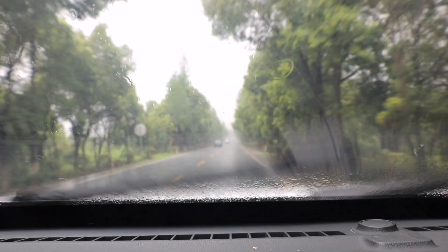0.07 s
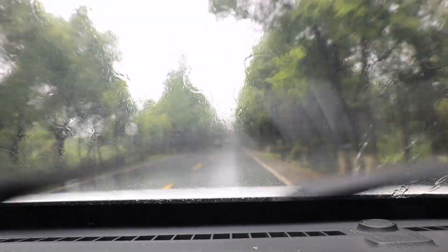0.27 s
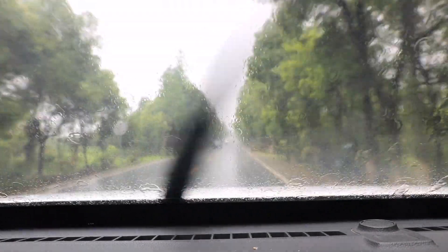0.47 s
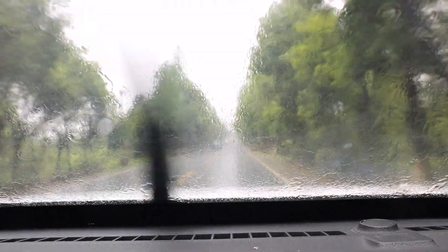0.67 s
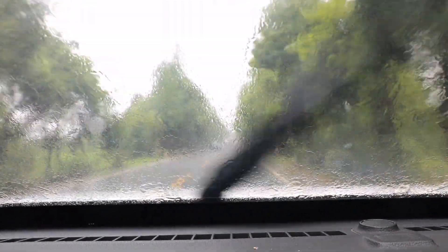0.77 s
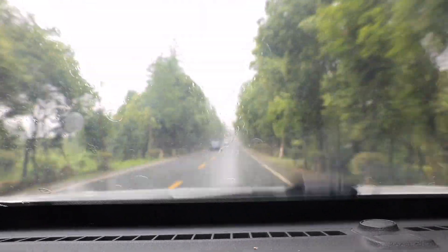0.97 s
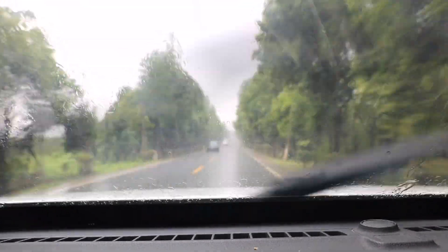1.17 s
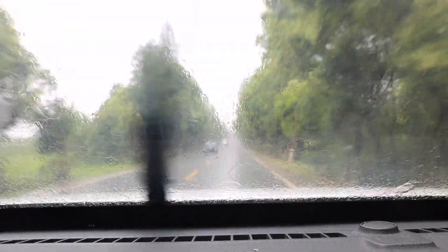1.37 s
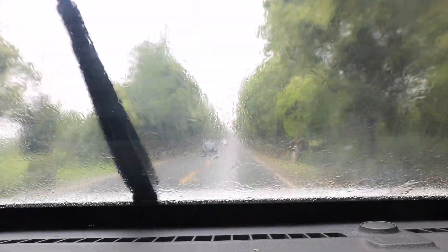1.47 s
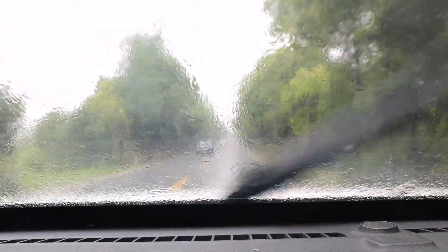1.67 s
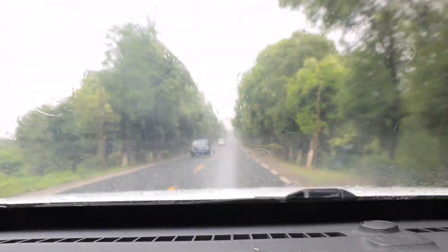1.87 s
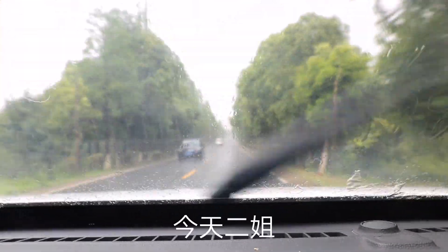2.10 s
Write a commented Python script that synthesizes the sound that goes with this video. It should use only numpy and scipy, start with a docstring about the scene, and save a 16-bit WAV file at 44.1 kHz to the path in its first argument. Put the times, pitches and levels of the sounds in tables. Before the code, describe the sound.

Heavy rain patters on a moving car's windshield and roof, heard from inside, cutting in just after the start and lasting to about 2 seconds. Bigger drops tick sharply through a fine hiss. The road rumbles low underneath, with dull thumps, strongest near 0.4 and 1.7 seconds. Soft wet wiper swishes pass around 0.4 and 0.9 seconds, then more clearly at 1.3 to 1.4 and 2.1.

```python
"""Heavy rain on a moving car, heard from the cabin; the sound cuts in just after the start.
Drops tick on the windshield and drum on the roof over a fine hiss of spray.
The road rumbles and thumps, and the wipers sweep the wet glass."""
import sys
import numpy as np
from scipy import signal
from scipy.fft import rfft, irfft, next_fast_len
from scipy.io import wavfile
from scipy.ndimage import uniform_filter1d, map_coordinates

SR = 44100
rng = np.random.default_rng(int(sys.argv[2]) if len(sys.argv) > 2 else 0)


def wav_record(signal):
    """Record a signal, one row per channel, as 16-bit PCM in the file named by sys.argv[1]."""
    frames = np.transpose(np.atleast_2d(signal))
    bounded = np.clip(frames, -1, 1)
    # unit amplitude maps onto the largest positive 16-bit level
    quanta = np.round(bounded * 32767).astype(np.int16)
    wavfile.write(sys.argv[1], SR, quanta)


N = 94241

START_S = .15  # fixed
TOP_HZ = 15850  # fixed
# how hard the rain hits the glass (s, level dB)
RAIN = [(.15, -29), (.25, -27.5), (.45, -27.5), (.51, -26.5), (.56, -28), (.68, -27), (.71, -30), (.74, -23), (.77, -32), (.82, -25), (.87, -28.5), (.93, -27), (1.16, -27.5), (1.19, -30.5), (1.31, -29.5), (1.34, -25), (1.37, -32.5), (1.4, -28), (1.43, -29.5), (1.49, -30.5), (1.56, -26.5), (1.68, -28.5), (1.88, -25), (1.95, -29), (2.0, -24), (2.06, -31), (2.1, -23.5), (2.14, -34)]
# the heaviest drops on the windshield (s, knock dB, bright splash dB, left-right dB)
BIG_DROPS = [(.1981, -1, -3, 1), (.207, 5, -16, -3), (.2717, -2, -5, -3), (.2927, 7, -10, 6), (.3056, 1, -10, -2),
             (.4141, 3, -16, 4), (.4274, 3, -15, 0), (.494, 5, -18, 1), (.5106, 5, -12, 4), (.517, 3, -14, 2),
             (.5222, 3, -8, -4), (.533, 6, -15, 6), (.6058, 4, -20, -4), (.6168, 2, -9, 1), (.6335, -3, -6, 4),
             (.6661, 4, -4, 6), (.6763, 3, -16, -1), (.7319, 4, -7, 2), (.7445, 1, -7, 3), (.7846, -1, -8, 3),
             (.7933, 0, -6, 3), (.8231, 1, -5, -1), (.852, 0, -8, 0), (.9048, 3, -18, -3), (.9418, 2, -5, -2),
             (1.0361, 2, -4, 3), (1.039, -2, -6, -2), (1.1232, 1, -7, -1), (1.1595, 7.5, -13, -6), (1.1625, 5.5, -13, 4),
             (1.2285, 1, -17, 6), (1.2549, -3, -7, -4), (1.2855, -1, -4, -3), (1.2954, -3, -12, 1), (1.3374, 4, -17, -1),
             (1.3855, 5, -18, -1), (1.4023, 3, -6, 4), (1.4761, 1, -17, 4), (1.4896, -1, -11, 0), (1.5167, 4, -9, -2),
             (1.5278, 2, -6, 2), (1.5398, -6, -6, -3), (1.5533, 0, -10, 4), (1.5713, 5, -15, 2), (1.6058, 0, -4, -3),
             (1.671, 1, -13, -2), (1.7093, 2, -17, -2), (1.8115, 5, -10, 2), (1.8466, 5, -15, 1), (1.8653, 3, -7, 3),
             (1.9679, 2, -17, -6), (1.9825, 1, -6, -4), (1.9956, 5, -15, 0), (2.0038, -1, -6, -1), (2.0246, 7, -10, -3),
             (2.0264, 6, -14, 6), (2.1004, 1, -9, 0)]  # fixed
# one drop on the glass (Hz, dB)
GLASS = [(100, -23), (350, -3.5), (700, -5.5), (1300, -10.5), (1750, -3), (2200, -6.5), (2700, 2), (3400, 0.5), (4400, -1.5), (5800, -4), (9000, -6), (9800, -10), (12500, -2.5), (15800, -46)]
SPREAD_S, RING_S, RING_DB = .0012, 0.0031, -1.5
PORT_LAG_S, PAN_DB = .00029, 3.5  # widest delay between the microphone's ports; level scatter between them
# one droplet of the spray (Hz, dB)
SPRAY = [(200, -61), (1500, 3), (3300, 2.5), (6000, -8.5), (9000, -5), (9800, -6), (12500, -13), (15800, -15)]
# roof panel under a drop (Hz, dB)
ROOF = [(40, -34.5), (85, 1.5), (130, 1), (210, 1.5), (290, -0.5), (380, -9.5), (650, -13), (800, -20), (1050, -10.5), (1500, -14), (4000, -45)]
# road noise in the cabin (s, level dB) and its colour (Hz, dB)
ROAD_LEVEL = [(.15, -29), (.4, -30), (.53, -27.5), (.66, -27.5), (.72, -32), (.85, -32), (.91, -28.5), (1.1, -30), (1.27, -30), (1.35, -27), (1.44, -30), (1.78, -32.5), (1.83, -28), (1.9, -30.5), (2.04, -33), (2.13, -27.5)]  # fixed
ROAD = [(12, -35), (22, -7), (29, -9), (36, -3.5), (46, -7), (63, -11.5), (85, -2.5), (112, -8), (220, -10.5), (400, -13.5), (1000, -19.5), (3000, -49)]
ROAD_DB = 1
# dull thumps of the body, from bumps and turning wipers (s, peak dB, pitch Hz, t60 s)
THUMPS = [(.308, -15, 58, .1), (.338, -20, 220, .12), (.424, -16, 190, .14), (.443, -7, 90, .12), (.445, -17, 255, .1), (.468, -13, 60, .11), (.645, -18, 110, .14), (.73, -18, 200, .13), (.885, -14, 195, .15), (.915, -17, 100, .17), (.965, -20, 240, .15), (1.005, -20, 210, .15), (1.215, -15, 245, .16), (1.29, -18, 180, .15), (1.345, -14.5, 115, .2), (1.477, -19, 90, .1), (1.742, -9.5, 197, .15), (1.895, -19, 340, .12), (2.088, -11.5, 180, .13)]  # fixed
# the overtones of a thump (ratio to its pitch, dB)
BODY = [(.72, -15), (0.996, -1), (1.36, -9), (1.899, -13)]
# a wet swish, likely the wiper blades pushing water (s, level dB) and its colour (Hz, dB)
SWISH_LEVEL = [(.15, -48), (.3, -40), (.36, -31), (.41, -41), (.6, -46), (.87, -45), (.905, -33), (.97, -41), (1.2, -38), (1.265, -26.5), (1.305, -33), (1.345, -27.5), (1.37, -28.5), (1.402, -23.5), (1.44, -39), (1.68, -40), (1.8, -33), (1.92, -32), (1.98, -38), (2.07, -40), (2.105, -26.5), (2.14, -32)]  # fixed
SWISH = [(150, 3.5), (400, -1), (540, 10.5), (660, 16.5), (780, 3.5), (900, 8), (1050, 10.5), (1300, 0.5), (1800, 6.5), (4000, -38)]
# likeness of left and right in the cabin (Hz, -1..1)
ALIKE = [(60, .985), (250, .94), (600, .73), (1100, .35), (1700, .25), (2300, -.4), (3600, 0), (12000, 0)]  # fixed
# level of the fine spray (s, level dB)
SPRAY_LEVEL = [(.15, -38), (.3, -37.5), (.46, -39.5), (.52, -36), (.56, -39), (.67, -38), (.72, -39), (.78, -37.5), (.9, -37.5), (1.02, -38.5), (1.045, -36), (1.07, -38), (1.165, -39), (1.185, -46), (1.27, -45), (1.29, -41), (1.4, -41), (1.44, -45), (1.508, -42), (1.516, -35.5), (1.62, -37), (1.69, -40), (1.8, -37.5), (1.95, -39), (2.01, -37.5), (2.06, -40), (2.1, -37), (2.14, -39)]  # fixed
ROOF_DB, ROOF_RING_S, ROOF_RANGE_DB = -29, 0.0045, 6.5
# the cabin's steady drone, likely the engine (Hz, dB)
DRONE = [(46, -34.5), (84, -41), (216, -38.5)]
THUMP_ATTACK_S = .007  # fixed
PATTER_DB = 1.53
CABIN_T60_S, CABIN_DB = 0.052, -7.5
CABIN_DELAY_S = .003  # fixed
SIZE_RANGE_DB = 10  # fixed
DULL_S = .00002  # fixed
BIG_DB, SPLASH_DB = -3, .3  # fixed
SPRAY_RING_S = 0.0026  # decay of a droplet's prickle
SPRAY_RANGE_DB = 20  # fixed
SPRAY_DB = 4.2  # fixed
CEILING = .75  # fixed
BEND_HZ = 3000  # fixed
BIG_RING_S, BIG_RING_DB = .004, 1  # fixed
SWISH_FLUTTER_DB = 2  # fixed
GLASS_TOP_HZ, KNOCK_TOP_HZ = 8000, 5800  # fixed


def amp(db):
    """Decibels to gain."""
    return 10 ** (np.asarray(db) / 20)


def unit(x):
    """Scale to rms 1."""
    return x / np.sqrt(np.mean(x ** 2) + 1e-20)


def along(points, hz):
    """(Hz, value) points on a log axis."""
    f, v = np.transpose(points)
    return np.interp(np.log(hz + 1), np.log(f + 1), v)


def level(rows):
    """Gain per sample from (s, dB) rows."""
    return amp(np.interp(np.arange(N) / SR, *np.transpose(rows)))


def wobble(rate):
    """A smooth random curve, rate knots a second."""
    return map_coordinates(rng.standard_normal(N // 100), [np.arange(N) * rate / SR], mode="mirror")


def filtered(x, response):
    """x times a response of frequency."""
    m = next_fast_len(N + SR // 2, real=True)
    return irfft(rfft(x, m) * response(np.fft.rfftfreq(m, 1 / SR)), m)[..., :N]


def struck(x, spectrum, size=4096):
    """Pass blows through a causal colour of unit energy."""
    cepstrum = irfft(np.log(amp(along(spectrum, np.fft.rfftfreq(size, 1 / SR)))))
    cepstrum[1:size // 2] *= 2
    cepstrum[size // 2 + 1:] = 0
    ring = irfft(np.exp(rfft(cepstrum)))
    return signal.fftconvolve(x, ring[None] / np.linalg.norm(ring), axes=1)[:, :N]


def diffuse(pair):
    """Give two unrelated signals the cabin's left-right likeness."""
    turn = lambda hz: np.arccos(np.clip(along(ALIKE, hz), -1, 1)) / 2
    mid, side = filtered(pair, lambda hz: np.array([np.cos(turn(hz)), np.sin(turn(hz))]))
    return np.array([mid + side, mid - side])


def rush(spectrum):
    """Diffuse stereo noise of rms 1."""
    return unit(diffuse(filtered(rng.standard_normal((2, N)), lambda hz: amp(along(spectrum, hz)))))


def impacts(times, db, pan_db, ring_s, ring_db, size=768):
    """Each drop is a tick and a short ring, with its own softness and direction.
    The tick crosses the panel as a bending wave, treble first: the farther the drop, the longer the chirp."""
    t, hz = np.arange(size) / SR, np.fft.rfftfreq(size, 1 / SR)
    soft, direction, distance, polarity = rng.random((len(times), 4)).T
    ticks = np.exp(-4j * np.pi * SPREAD_S * (.5 + distance[:, None]) * np.sqrt(BEND_HZ * hz))  # fixed
    ticks *= np.sign(polarity - .5)[:, None]
    rings = rng.standard_normal((len(times), size)) * np.exp(-t / ring_s)
    rings *= amp(ring_db) / np.linalg.norm(rings, axis=1, keepdims=True)
    bursts = irfft((ticks + rfft(rings)) / (1 + 2j * np.pi * hz * DULL_S * soft[:, None]))
    bursts /= np.linalg.norm(bursts, axis=1, keepdims=True)
    out = []
    for side in (1, -1):
        at = np.abs(np.round((times + side * (direction - .5) * PORT_LAG_S) * SR)).astype(int)
        weights = bursts * amp(db + side * pan_db / 2)[:, None]
        out.append(np.bincount((at[:, None] + np.arange(size)).ravel(), weights.ravel(), N)[:N])
    return np.array(out)


def shower(ring_s, range_db, count):
    """count drops a second at random moments, many light and few heavy."""
    when, weight, place = rng.random((count * N // SR, 3)).T
    return impacts(when * N / SR, -range_db * np.sqrt(weight), PAN_DB * (2 * place - 1), ring_s, RING_DB)


def windshield():
    """Dense patter and fine spray; each heavy drop knocks the glass and throws a bright splash."""
    patter = amp(PATTER_DB) * level(RAIN) * unit(struck(shower(RING_S, SIZE_RANGE_DB, count=1400), GLASS))
    s, knock_db, splash_db, pan_db = np.transpose(BIG_DROPS)
    knocks = struck(impacts(s, knock_db + BIG_DB, pan_db, BIG_RING_S, BIG_RING_DB), GLASS)
    splashes = struck(impacts(s, splash_db + SPLASH_DB, pan_db, BIG_RING_S, BIG_RING_DB), SPRAY)
    return soften(patter, GLASS_TOP_HZ) + soften(knocks, KNOCK_TOP_HZ) + splashes + spray()


def roof():
    """Drops drum on the lined roof panel."""
    return amp(ROOF_DB) * unit(struck(shower(ROOF_RING_S, ROOF_RANGE_DB, count=400), ROOF))


def spray():
    """The finest droplets prickle brightly on the glass."""
    return amp(SPRAY_DB) * level(SPRAY_LEVEL) * unit(struck(shower(SPRAY_RING_S, SPRAY_RANGE_DB, count=520), SPRAY))


def road():
    """Tyres rumble under a slightly unsteady drone."""
    t = np.arange(N) / SR
    drone = sum(np.sqrt(2) * amp(db) * np.sin(2 * np.pi * hz * t + .5 * wobble(10.46)) for hz, db in DRONE)
    return amp(ROAD_DB) * level(ROAD_LEVEL) * rush(ROAD) + drone


def thumps():
    """Soft blows ring the body panels briefly."""
    out, t = np.zeros(N + SR), np.arange(SR // 2) / SR
    for s, db, hz, t60 in THUMPS:
        envelope = np.exp(-np.log(1000) * t / t60) * (1 - np.exp(-t / THUMP_ATTACK_S))
        ring = sum(amp(part_db) * np.sin(2 * np.pi * (hz * ratio * t + rng.random())) for ratio, part_db in BODY)
        out[round(s * SR):][:len(t)] += amp(db) * envelope * ring
    return out[:N]


def swish():
    """Water is pushed across the glass."""
    return level(SWISH_LEVEL) * amp(SWISH_FLUTTER_DB * wobble(59.24)) * rush(SWISH)


def cabin(x, count=6, size=128):
    """The short, padded echo of the cabin, different for each of count patches of the glass."""
    t = np.arange(SR // 8) / SR
    tails = rng.standard_normal((count, 2, len(t))) * np.exp(-np.log(1000) * t / CABIN_T60_S) * (t > CABIN_DELAY_S)
    tails /= np.linalg.norm(tails, axis=2, keepdims=True)
    patch = np.repeat(rng.integers(count, size=N // size + 1), size)[:N]
    return diffuse(sum(signal.fftconvolve(x * np.sqrt(np.abs(uniform_filter1d(1.0 * (patch == k), size // 2))), tail, axes=1)[:, :N]
                       for k, tail in enumerate(tails)))


def soften(x, hz):
    """Roll off the treble above hz."""
    return signal.sosfilt(signal.butter(3, hz, fs=SR, output="sos"), x)  # fixed


def scene():
    """Rain on glass and roof over the noise of driving."""
    glass = windshield()
    return glass + amp(CABIN_DB) * cabin(glass) + roof() + road() + thumps() + swish()


def record(dry):
    """The sound cuts in, the highest peaks are rounded off, and nothing is kept above the band limit."""
    rounded = dry / (1 + np.abs(dry / CEILING) ** 4) ** (1 / 4)  # fixed
    return filtered(rounded * (np.arange(N) / SR > START_S), lambda hz: hz < TOP_HZ)


dry = scene()
out = record(dry)
wav_record(out)
```